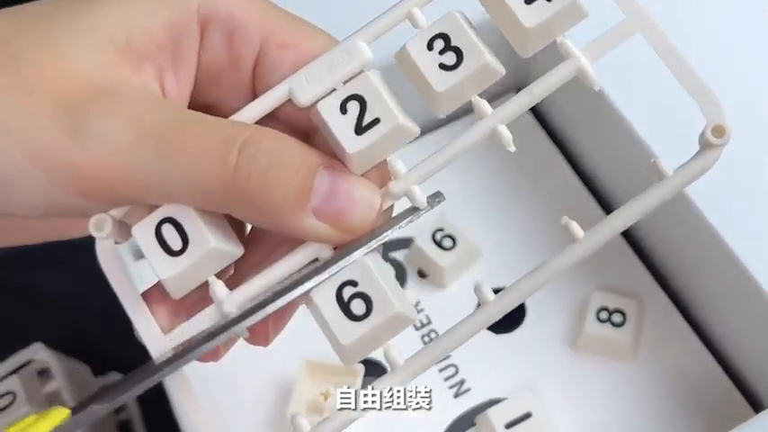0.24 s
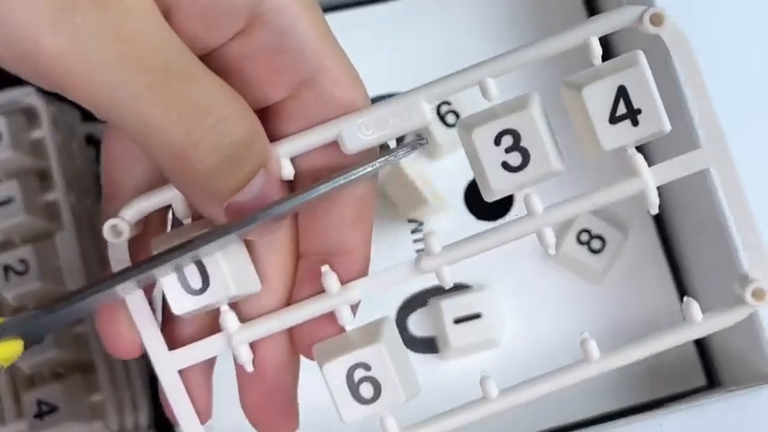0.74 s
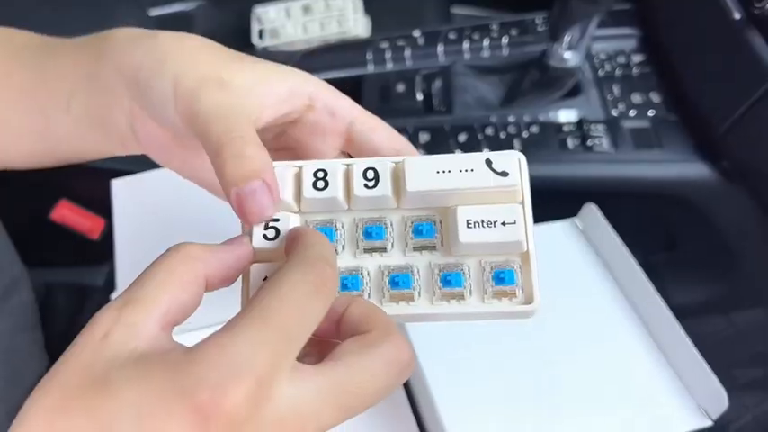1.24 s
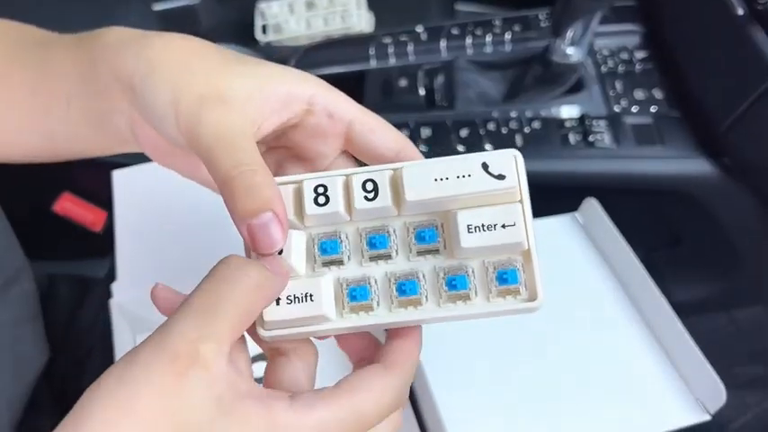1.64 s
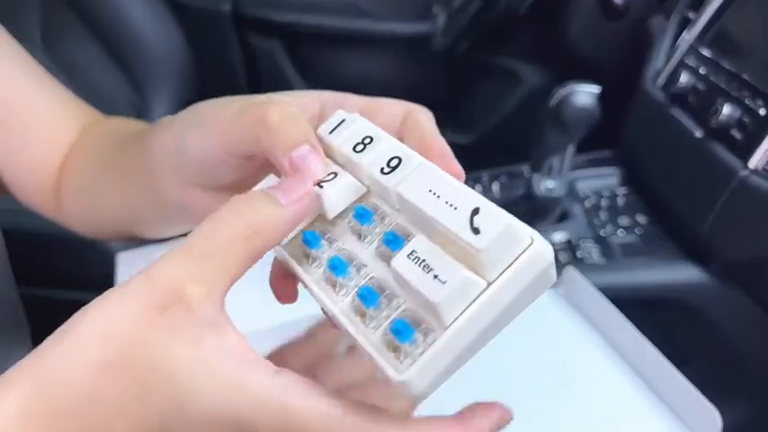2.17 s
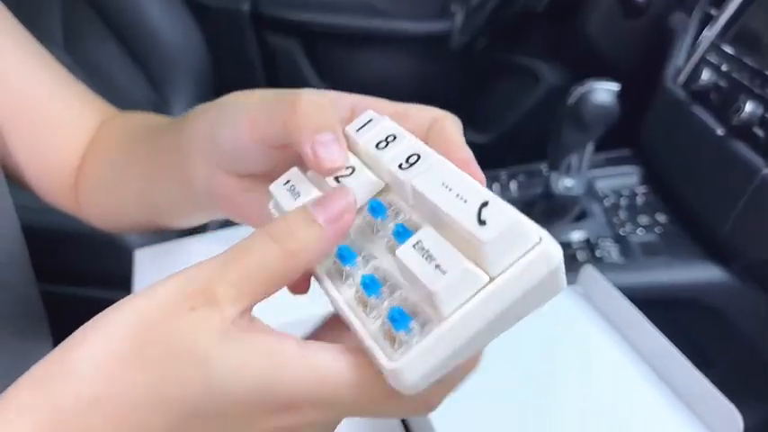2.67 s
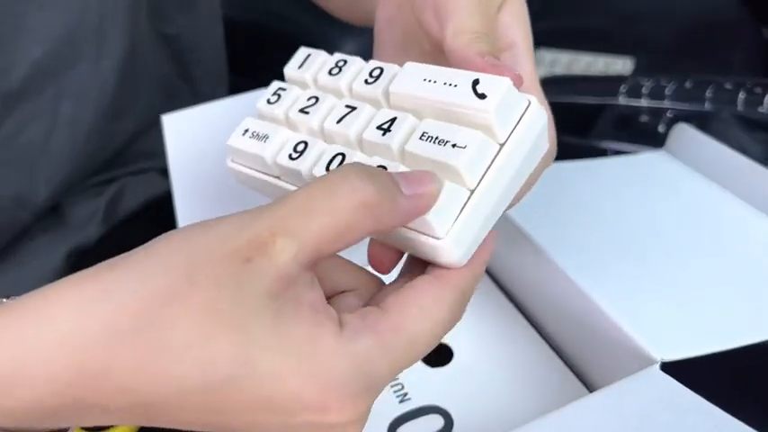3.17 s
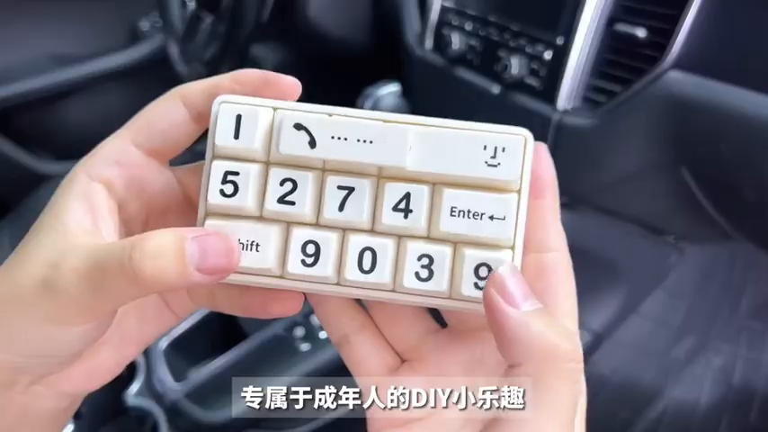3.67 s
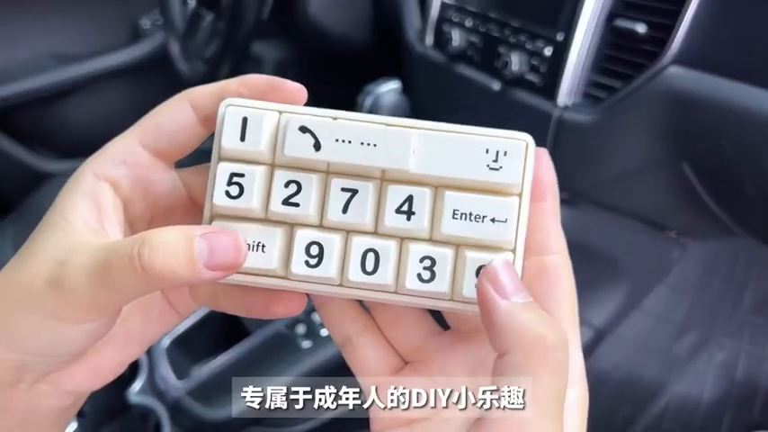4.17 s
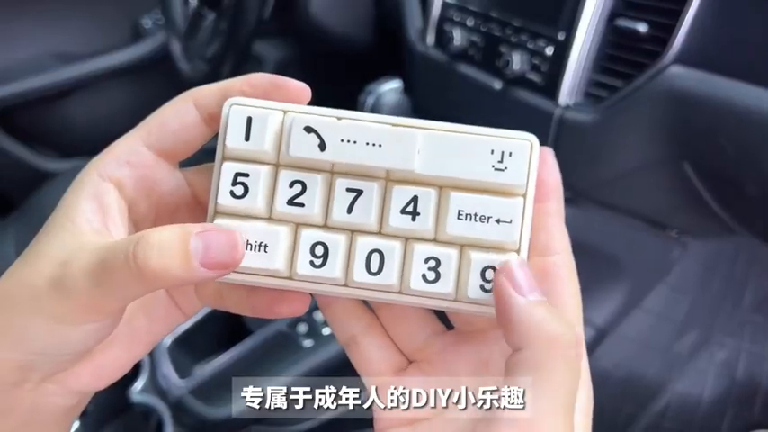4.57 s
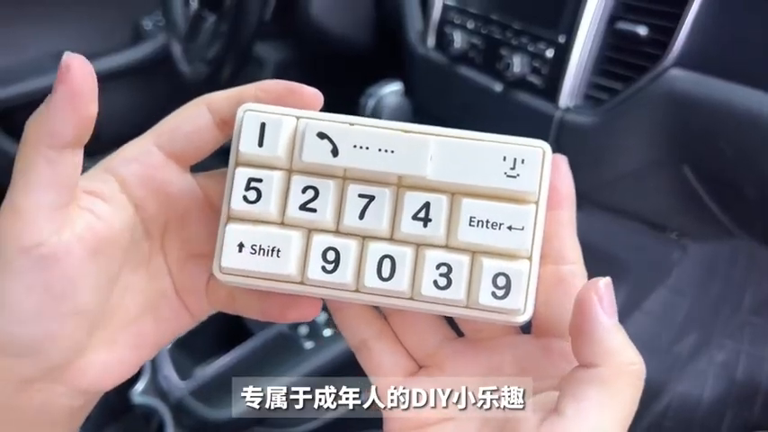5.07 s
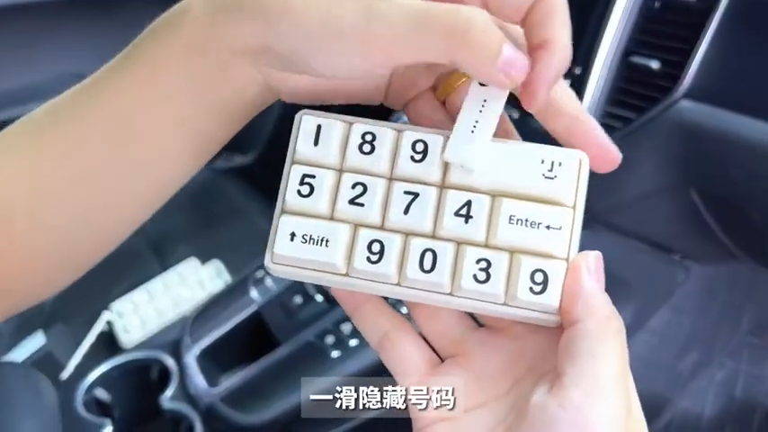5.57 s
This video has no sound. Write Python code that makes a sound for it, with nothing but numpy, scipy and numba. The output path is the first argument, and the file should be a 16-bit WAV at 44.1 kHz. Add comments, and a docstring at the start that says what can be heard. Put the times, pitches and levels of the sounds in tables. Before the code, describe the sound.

Small plastic key caps are snipped loose, drop into a cardboard box, then snap and tap crisply on a little keypad, heard very close.

```python
"""Plastic key caps on a keypad

Key caps are snipped off a frame, drop into a cardboard box, then are pressed onto keypad switches and
tapped, close up in a quiet parked car. Clicks and noisy grains ring the modes of plastic and card;
springs are hissing coil modes, thumps decaying low sines, air and rustle shaped noise.
The sound drops out briefly five times."""
import sys
import numpy as np
from scipy import signal
from scipy.io import wavfile
from numba import njit

SR = 44100
rng = np.random.default_rng(int(sys.argv[2]) if len(sys.argv) > 2 else 0)


def inscribe(sig):
    """Save sig as 16-bit PCM at rate SR to the path in sys.argv[1].

    A 1-D sig is mono; a 2-D sig holds one channel per row.
    Samples are clipped to [-1, 1] before scaling.
    """
    pcm = np.round(np.clip(np.atleast_2d(sig).T, -1, 1) * 32767)
    wavfile.write(sys.argv[1], SR, pcm.astype(np.int16))


N = 256356

# clicks of blades, caps and switches: start_s, peak_db, pitch_hz (part struck), case_db (knock re peak)
CLICKS = [(0.0659,-5,7880,-16.5),(0.1002,-10.5,4350,-18),(0.2223,-7,6000,-21),(0.3238,-4,4140,-18),(0.6384,-18,7400,2),(0.704,-16,3560,0),(0.7292,-4.5,4700,-18),(0.922,-11,8100,-14),
          (1.1453,-3.5,4420,-16.5),(1.363,-15.5,3600,1.5),(1.4299,-24.5,7100,12.5),(1.648,-19.5,3490,6.5),
          (1.7389,-10.5,10700,8),(1.848,-0.5,4400,1),(2.3064,5.5,7150,-10.5),(2.321,-1.5,7000,-2),(2.349,-13.5,4100,-2),(2.387,-20,4630,0.5),
          (2.459,-22,4400,-2),(2.5079,3.5,4750,-8.5),(2.613,-23,4400,7),(2.88,6,4450,-7.5),(2.927,-15,3900,4.5),(3.0791,-18,3600,8),
          (3.11,-12,3600,-18),(3.2421,-19.5,3960,-0.5),(3.2623,-15,4900,7),(3.411,14.5,4360,-8),(3.7264,4.5,6980,-33.5),(3.817,-6.5,9200,-31),(3.8337,2,9400,-33.5),
          (3.903,-12,5000,-21),(3.919,-9,9800,-3),(3.9583,6,6940,-40),(4.026,-14.5,6960,-14),(4.044,-9.5,6850,1.5),(4.083,5,9000,-21.5),
          (4.1668,-14.5,6800,-5.5),(4.1843,-8,9400,0.5),(4.2125,8.5,6860,-54),(4.395,7,9300,-64),(4.562,-12,4330,-18.5),(4.588,-13,9600,1),(4.627,-10,7050,-16),(4.6472,12,7100,-81),(4.809,-9,6600,-3.5),
          (5.288,-13.5,8060,2),(5.3295,-15.5,3650,-4),(5.344,-21,3860,-12),(5.4275,-11,3780,-12.5),(5.5093,7.5,5110,-31),(5.732,-19,3830,-8)]
# plastic grinding on plastic: middle_s, level_db, pitch_hz (part rubbed), focus_db, case_db (re level), length_s
GRINDS = [(0.496, -42, 4900, 3, -2.5, 0.014), (0.533, -36, 8840, 7.5, -11.5, 0.042),
          (0.726, -32.5, 4440, 10.5, 8, 0.022), (0.955, -30.5, 4580, 11.5, -3.5, 0.035),
          (1.33, -15, 9140, 20, -37, 0.028), (1.841, -24.5, 4140, 0, -16, 0.018),
          (2.314, -31, 6800, -2, -3.5, 0.027), (2.52, -20, 4530, 6, -7, 0.031),
          (2.706, -44, 5100, -0.5, 2.5, 0.039), (3.103, -33.5, 4040, 36, 1, 0.033),
          (3.405, -15.5, 4520, 12.5, -21, 0.015), (3.845, -36.5, 6900, 20, -7.5, 0.042),
          (4.391, -26, 9030, 15.5, -14, 0.028), (4.579, -43, 9140, 7.5, 0.5, 0.036),
          (4.638, -19.5, 6950, 21.5, -39, 0.015), (5.45, -16, 12500, 24.5, -46, 0.027),
          (5.452, -25.5, 3680, 5, -35, 0.023), (5.505, -25.5, 4830, 8, -47, 0.021),
          (5.658, -32, 4700, 3.5, 2, 0.017)]
# modes of caps, case and switch leaves: mode_hz, mode_db, t60_s
PLASTIC_MODES = [(806, -7.5, 0.0028), (1213, -12.5, 0.0071), (1550, -8.5, 0.012), (1880, -2.5, 0.0034),
                 (2810, 0, 0.00093), (3570, -1.5, 0.0039), (4093, -1.5, 0.0041), (4683, -4, 0.0068),
                 (5280, -8.5, 0.0069), (5990, -3.5, 0.0036), (6920, -3.5, 0.0048), (7630, -4.5, 0.0077),
                 (8374, -4, 0.0051), (9300, -5, 0.0053), (10184, 1, 0.003), (11150, -8.5, 0.0086),
                 (12060, -6.5, 0.006), (14000, -16.5, 0.0043), (14320, -10.5, .004)]
# coil buzz of the switch springs: coil_hz, level_db, fading_s, coil_t60_s
SPRING_MODES = [(4800, -87.5, 0.059, 0.0061), (7000, -81, 0.096, 0.0022), (9480, -81.5, 0.09, 0.0029)]
# caps landing, bouncing and scraping in the box: start_s, peak_db, wall_hz
DROPS = [(0.223, 9, 715), (0.2459, 0, 860), (0.2545, -16.5, 820), (0.3244, 9, 1160), (.7295, 7.5, 885),
         (0.792, -4.5, 930), (0.8028, 1, 780), (0.862, -10.5, 750), (.9597, 1.5, 865), (.98, -14, 880)]
# modes of the cardboard walls: mode_hz, mode_db, t60_s
BOX_MODES = [(560, -2, .026), (750, -1, .024), (960, -2, .028), (1120, -2, .03), (1330, -3, .022),
             (850, 2, .007), (1850, 0, .007), (3900, -4, .005), (4800, -2, .004)]
# low thumps under the loud clicks, and dull rubs: start_s, peak_db, pitch_hz, t60_s
THUMPS = [(0.224, -18.5, 101, 0.031), (0.703, -9.5, 236.5, 0.083), (0.845, -18.5, 140, 0.13),
          (1.303, -36.5, 246, 0.46), (1.8486, -15, 493, 0.025), (1.985, -35.5, 141.5, 0.65),
          (2.517, -20.5, 234, 0.032), (3.4122, -1.5, 535, 0.01), (3.654, -32, 464, 0.13),
          (3.658, -31, 90.5, 0.14)]
# background levels over time: time_s, air_db, rustle_db
BACKGROUND = [(0, -45.5, -29), (.15, -48, -49), (0.349, -45.5, -50.5), (1.301, -39, -53.5),
              (1.9, -48, -67.5), (2.998, -44.5, -58), (4.902, -47, -70), (5.398, -40, -59.5)]
# cabin air spectrum: freq_hz, density_db (per Hz, relative)
AIR_SPECTRUM = [(25, -11), (108, 2.5), (427, -4), (988, -1), (2200, -7.5), (2900, -14), (6920, -23.5),
                (16000, -34)]
# hand rustle spectrum: freq_hz, density_db (per Hz, relative)
RUSTLE_SPECTRUM = [(2000, -31), (4000, -2.5), (7000, 3.5), (10000, -29.5)]
# brief dropouts: cut_s, return_s, fade_s, depth_db
DROPOUTS = [(.370, .385, .03, -19), (2.070, 2.105, .015, -30), (2.823, 2.858, .012, -50),
            (3.618, 3.632, .025, -30), (5.145, 5.183, .03, -45)]

CASE_HZ, PARTS_HZ = 1600, 3600   # modes below belong to the case, above to the small parts; blended between
SMALL_HZ = 2 * CASE_HZ   # modes above swell into their ring
FOCUS_DB, FOCUS_OCTAVES = 9, 0.095   # the struck part's own mode stands out
FOCUS_PER_CASE_DB = 0.1965   # focus dB gained per dB less knock of the case
PARTNER_OCTAVES, PARTNER_SHARE = 0.546, 0.45   # lesser peaks this far above and below the pitch
BELOW_DB_PER_OCT, ABOVE_DB_PER_OCT = 1.5, 3   # loss away from the pitch
SOFTNESS = 0.29   # weak contacts are duller: extra dB per octave above, per dB under full scale
GRIND_PEAK_DB = 19   # a grind's peaks over its level
HOLD_SHARE, GRIND_FADE_DB_PER_LENGTH = 0.47, 46   # held for this share of length_s, then faded each side
SWELL_T60_S, GRIP_DETUNE = .004, .012   # detune: spread of mode pitches between contacts, as a share
TAPPING_S, TRAVEL_S = (3.7, 5.0), .005   # tapped keys reach the case this long after the switch clicks
KEYS_ON_S = 1.1   # keypad in hand: springs sound from here
WALL_FOCUS_DB, WALL_OCTAVES = 11.5, 0.18   # the wall touched stands out
CABIN_DB, CABIN_T60_S = -25, 0.12
CUTOFF_HZ = 15700


def plastic(spread_db=4.0):
    """Clicks and noisy grains ring shared modes; each click changes their strengths and tuning."""
    out, grains = np.zeros(N), noise_grains(7000)
    luck = rng.standard_normal((len(CLICKS), 2, len(PLASTIC_MODES)))
    click_at = samples(CLICKS)
    nearest = np.searchsorted((click_at[1:] + click_at[:-1]) // 2, np.arange(N))
    for k, (mode_hz, mode_db, t60_s) in enumerate(PLASTIC_MODES):
        blows, noise_level = contact(mode_hz, spread_db * luck[:, 0, k])
        signs = rng.choice([-1, 1], N)
        force = blows * (-1) ** k + noise_level * grains * signs
        held_hz = mode_hz * (1 + GRIP_DETUNE * luck[:, 1, k])
        if mode_hz > SMALL_HZ:
            force = swell(force, held_hz, nearest)
        out += amp(mode_db) * ring(force, held_hz, t60_s, nearest)
    return out


def contact(hz, luck_db):
    """Click impulses, and the envelope of grinds and noise around clicks, as felt by a mode here."""
    t, blows = np.arange(N) / SR, np.zeros(N)
    start_s, peak_db, pitch_hz, case_db = np.transpose(CLICKS)
    tapped = (start_s > TAPPING_S[0]) * (start_s < TAPPING_S[1])
    lag = int(TRAVEL_S * SR) * tapped * (hz < SMALL_HZ)
    focus_db = FOCUS_DB - FOCUS_PER_CASE_DB * case_db
    click_db = colour_db(peak_db, pitch_hz, focus_db, case_db, peak_db, hz)
    blows[samples(CLICKS) + lag] = amp(click_db + luck_db)
    noise_level = noise_around(blows, lead_db=-38.5, lead_s=0.0092, tail_db=-27, tail_s=0.007)
    for middle_s, level_db, pitch_hz, focus_db, case_db, length_s in GRINDS:
        part = slice(int((middle_s - 2 * length_s) * SR), int((middle_s + 2 * length_s) * SR))
        away = np.maximum(np.abs(t[part] - middle_s) / length_s - HOLD_SHARE / 2, 0)
        grind_db = colour_db(level_db, pitch_hz, focus_db, case_db, level_db + GRIND_PEAK_DB, hz)
        noise_level[part] += amp(grind_db - GRIND_FADE_DB_PER_LENGTH * away)
    return blows, noise_level


def colour_db(level_db, pitch_hz, focus_db, case_db, peak_db, hz):
    """Each event's level at one frequency: focus on the part touched, duller when weak, the case below."""
    octaves = np.log2(max(hz, PARTS_HZ) / pitch_hz)
    above = ABOVE_DB_PER_OCT + SOFTNESS * np.maximum(-peak_db, 0)
    own = np.exp(-(octaves / FOCUS_OCTAVES) ** 2)
    partner = PARTNER_SHARE * np.exp(-((np.abs(octaves) - PARTNER_OCTAVES) / FOCUS_OCTAVES) ** 2)
    loss_db = np.where(octaves > 0, above, -BELOW_DB_PER_OCT) * octaves
    part_db = focus_db * (own + partner - 1) - loss_db
    share = np.clip(np.log(hz / CASE_HZ) / np.log(PARTS_HZ / CASE_HZ), 0, 1)
    return level_db + share * part_db + (1 - share) * case_db


def swell(force, hz, which):
    """The contact force lingers at the mode's own pitch, which narrows its ring."""
    return 2 * (1 - amp(-60 / (SWELL_T60_S * SR))) * ring(force, hz, SWELL_T60_S, which)


def springs():
    """Many close coil modes blur into a narrow hiss that fades after each shake."""
    out, keys_on = np.zeros(N), np.arange(N) > KEYS_ON_S * SR
    for coil_hz, level_db, fading_s, coil_t60_s in SPRING_MODES:
        blows, noise_level = contact(coil_hz, 0)
        energy = fall((blows ** 2 + noise_level ** 2) * keys_on, fading_s / 2)
        hiss = ring(ring(rng.standard_normal(N), coil_hz, coil_t60_s), coil_hz, coil_t60_s)
        out += amp(level_db) * np.sqrt(energy) * hiss
    return out


def box(level_db=-6, spread_db=2.0):
    """Landings and scrapes ring the cardboard walls, by soft impulses and noisy grains around them."""
    luck = rng.standard_normal((len(DROPS), len(BOX_MODES)))
    out, grains = np.zeros(N), noise_grains(3000)
    _, peak_db, wall_hz = np.transpose(DROPS)
    for k, (mode_hz, mode_db, t60_s) in enumerate(BOX_MODES):
        blows = np.zeros(N)
        focus = np.exp(-(np.log2(mode_hz / wall_hz) / WALL_OCTAVES) ** 2) - 1
        drop_db = peak_db + level_db + mode_db + WALL_FOCUS_DB * focus + spread_db * luck[:, k]
        blows[samples(DROPS)] = amp(drop_db)
        noise_level = noise_around(blows, lead_db=-36, lead_s=0.006, tail_db=-29, tail_s=0.024)
        blows[samples(DROPS)] *= amp(np.minimum(peak_db, 0))   # weak ones slide more than they knock
        soft_blows = fall(blows, .0001) / 5   # card gives way
        out -= ring(soft_blows + noise_level * grains * rng.choice([-1, 1], N), mode_hz, t60_s)
    return out


def thumps(noise_db=-8, noise_hz=800):
    """Low thumps: decaying low sines, each with low-passed noise."""
    out = np.zeros(N)
    low_pass = signal.butter(2, noise_hz, fs=SR, output="sos")
    dull_noise = rms_one(signal.sosfilt(low_pass, rng.standard_normal(N)))
    t = np.arange(SR // 5) / SR
    for start_s, peak_db, pitch_hz, t60_s in THUMPS:
        at = int(start_s * SR)
        body = np.sin(2 * np.pi * pitch_hz * t) + amp(noise_db) * dull_noise[at:at + len(t)]
        onset = 1 - np.exp(-t / 0.00039)
        out[at:at + len(t)] += amp(peak_db - 60 * t / t60_s) * onset * body
    return signal.sosfilt(signal.butter(2, 40, "high", fs=SR, output="sos"), out)


def cabin(x):
    """Dense short reflections from seats and glass: convolution with decaying noise."""
    t = np.arange(int(.2 * SR)) / SR
    tail = rng.standard_normal(len(t)) * amp(-60 * t / CABIN_T60_S) * (t > .002)
    return amp(CABIN_DB) * signal.fftconvolve(x, tail / np.sqrt(np.sum(tail ** 2)))[:N]


def shaped_noise(spectrum, flicker_db):
    """Half-octave noise bands, each with its own level and slow flicker; rms 1."""
    out, edges_hz = 0, 25 * 2 ** np.arange(0, 9.6, .5)
    freq_hz, density_db = np.transpose(spectrum)
    white = rng.standard_normal((2, N))   # neighbouring bands use different noise
    for k, (low, high) in enumerate(zip(edges_hz, edges_hz[1:])):
        band_pass = signal.butter(2, [low, high], "band", fs=SR, output="sos")
        band = signal.sosfilt(band_pass, white[k % 2])
        knots = rng.standard_normal(N // 2000 + 2)
        flicker = np.interp(np.arange(N), np.arange(0, N + 2000, 2000), knots)
        level_db = np.interp(np.log(low * high) / 2, np.log(freq_hz), density_db)
        out = out + amp(level_db + flicker_db * flicker) * band
    return rms_one(out)


def noise_around(blows, lead_db, lead_s, tail_db, tail_s):
    """Envelope of noise that rises into each blow and fades after it."""
    lead = fall(blows[::-1], lead_s)[::-1]
    return amp(lead_db) * lead + amp(tail_db) * fall(blows, tail_s)


def noise_grains(per_s):
    """Impulses at random moments, of uneven size; rms 1."""
    size_db = 3.36 * np.minimum(rng.exponential(1, N), 4)
    return rms_one((rng.random(N) < per_s / SR) * amp(size_db))


def fall(x, seconds):
    """Every impulse becomes an exponential fade with this time constant."""
    return signal.lfilter([1], [1, -np.exp(-1 / (seconds * SR))], x + 1e-18)


def ring(force, hz, t60_s, which=0):
    """A unit click sets a sine of height 1 ringing; which picks the pitch from hz at each moment."""
    r, w = amp(-60 / (t60_s * SR)), 2 * np.pi * np.atleast_1d(hz) / SR
    return resonate(force + 1e-18, np.sin(w), 2 * r * np.cos(w), r * r, np.zeros(N, int) + which)


@njit
def resonate(force, into, once, twice, which):
    """Two-pole recursion; each sample picks one of several tunings."""
    out = np.zeros(len(force))
    for i in range(2, len(force)):
        out[i] = into[which[i]] * force[i - 1] + once[which[i]] * out[i - 1] - twice * out[i - 2]
    return out


def samples(rows):
    """Sample index of each row's time."""
    return (np.array(rows)[:, 0] * SR).astype(int)


def amp(db):
    """Decibels to gain."""
    return 10 ** (np.asarray(db) / 20)


def rms_one(x):
    """Scaled to unit rms."""
    return x / np.sqrt(np.mean(x ** 2) + 1e-20)


def scene():
    """Hands at work, their cabin reflections, air and rustle."""
    time_s, air_db, rustle_db = np.transpose(BACKGROUND)
    t = np.arange(N) / SR
    no_bass = signal.butter(4, 430, "high", fs=SR, output="sos")   # small things radiate no bass
    work = signal.sosfilt(no_bass, plastic() + box()) + springs() + thumps()
    air = amp(np.interp(t, time_s, air_db)) * shaped_noise(AIR_SPECTRUM, flicker_db=1.2)
    rustle = amp(np.interp(t, time_s, rustle_db)) * shaped_noise(RUSTLE_SPECTRUM, flicker_db=2.0)
    return (work + cabin(work) + air + rustle)[None]


def record(dry):
    """Brief dropouts, hard clipping of the loudest clicks, steep treble cut."""
    t, gain_db = np.arange(N) / SR, np.zeros(N)
    for cut_s, return_s, fade_s, depth_db in DROPOUTS:
        corners_s = [cut_s - .002, cut_s + 0.0038, return_s, return_s + fade_s]
        gain_db += np.interp(t, corners_s, [0, depth_db, depth_db, 0])
    clipped = np.clip(dry * amp(gain_db), -.9, .9)
    return signal.sosfilt(signal.ellip(12, 1, 100, CUTOFF_HZ, fs=SR, output="sos"), clipped)


dry = scene()
out = record(dry)
inscribe(out)
```